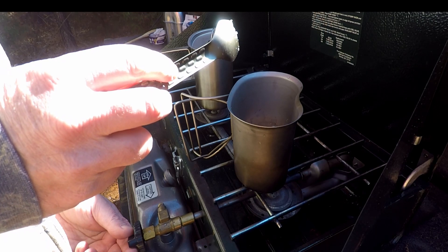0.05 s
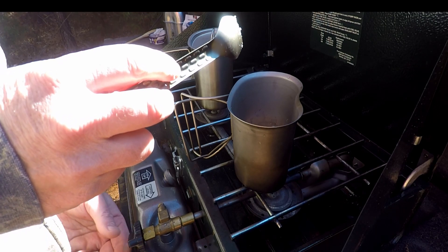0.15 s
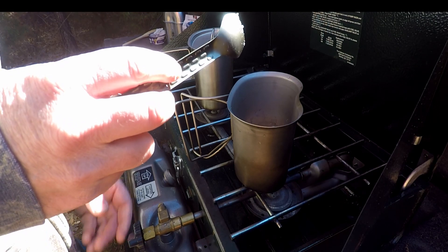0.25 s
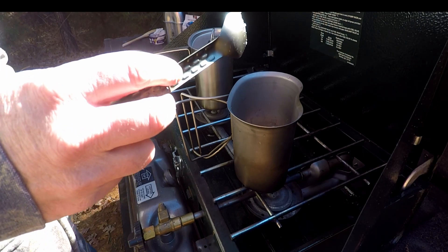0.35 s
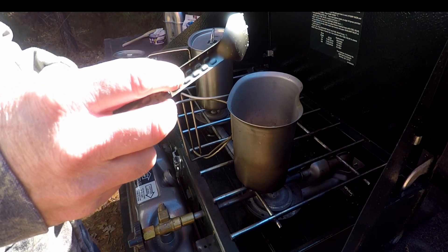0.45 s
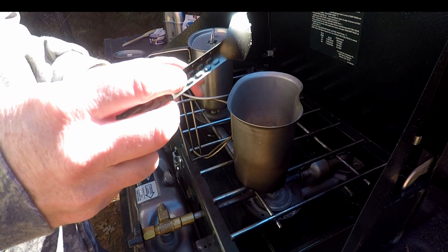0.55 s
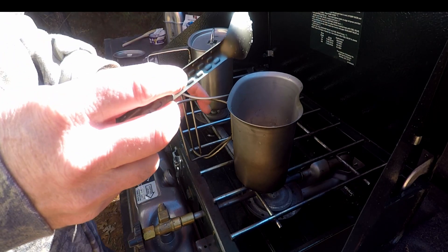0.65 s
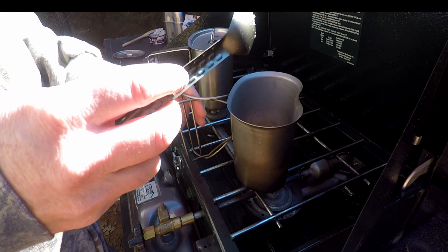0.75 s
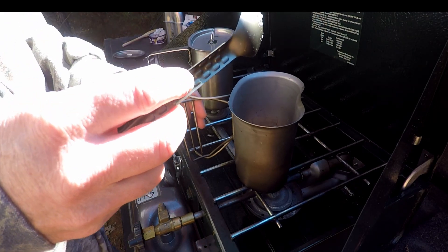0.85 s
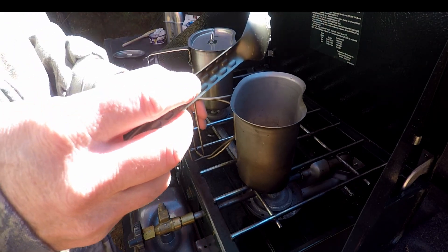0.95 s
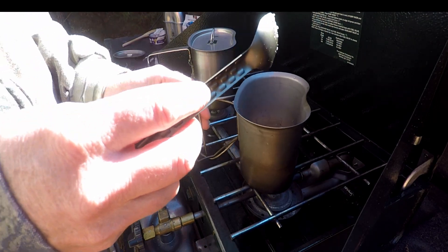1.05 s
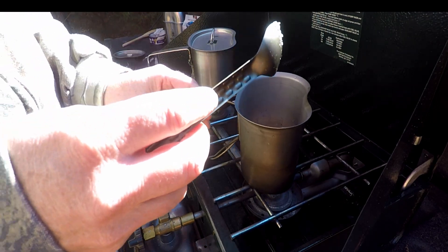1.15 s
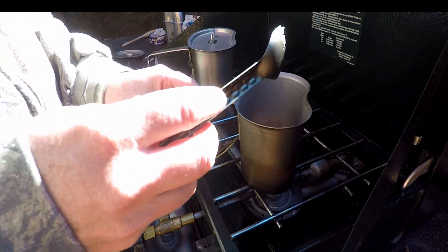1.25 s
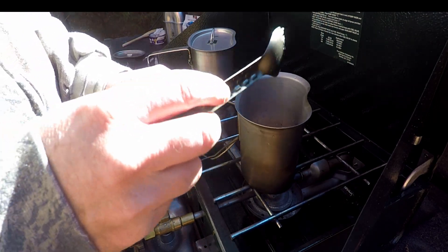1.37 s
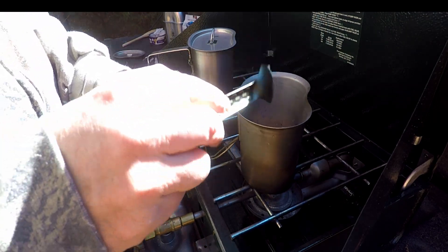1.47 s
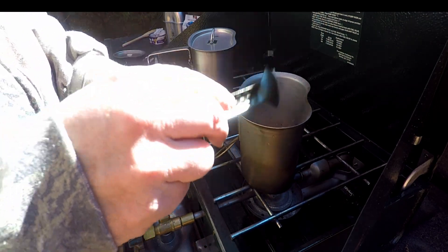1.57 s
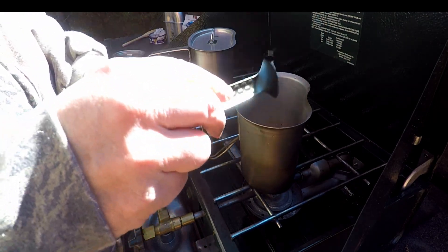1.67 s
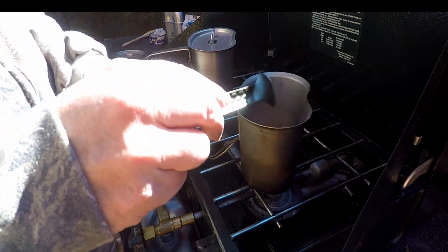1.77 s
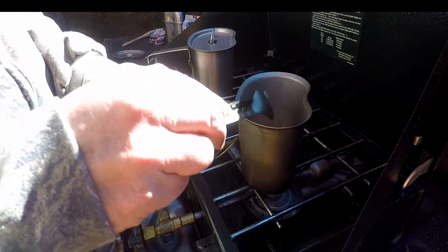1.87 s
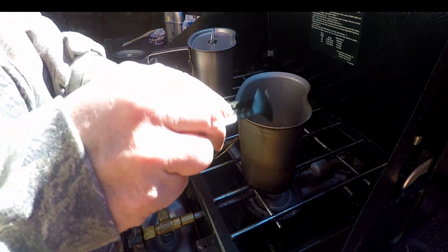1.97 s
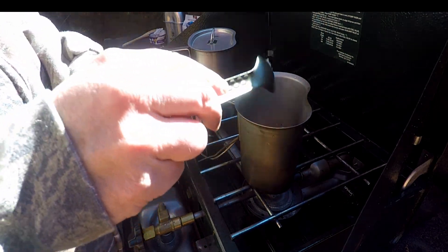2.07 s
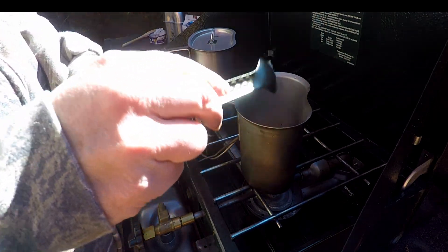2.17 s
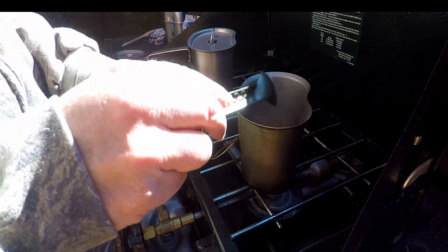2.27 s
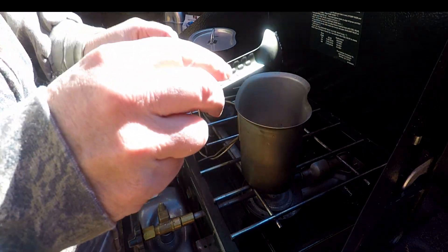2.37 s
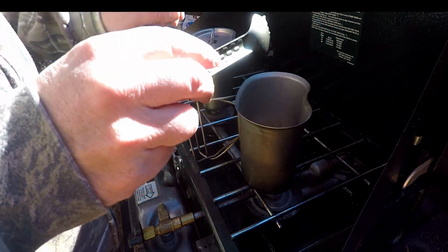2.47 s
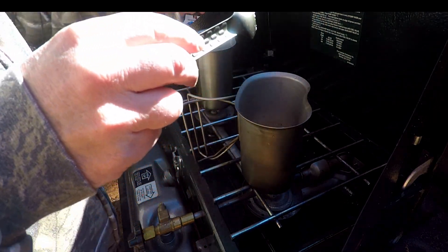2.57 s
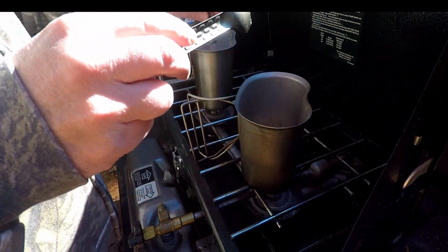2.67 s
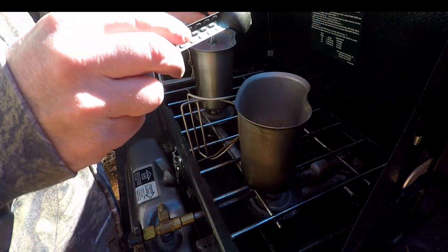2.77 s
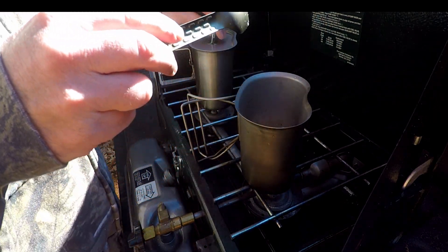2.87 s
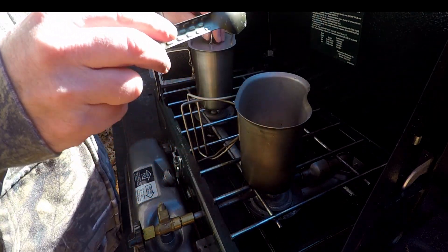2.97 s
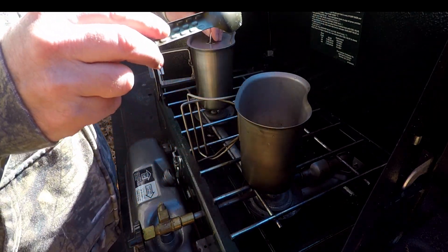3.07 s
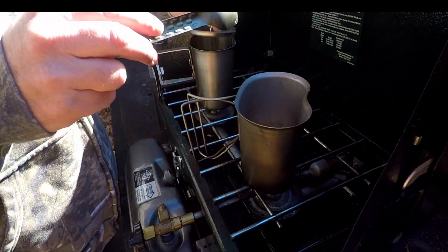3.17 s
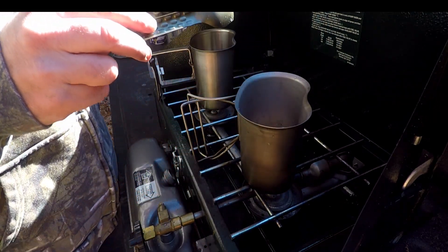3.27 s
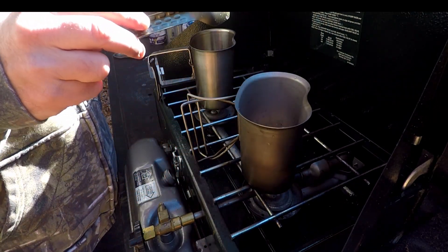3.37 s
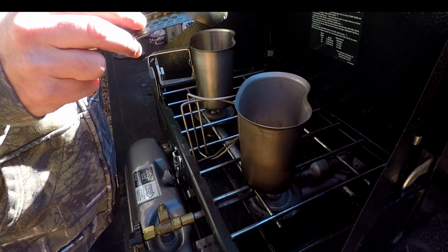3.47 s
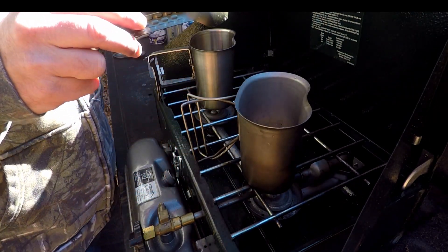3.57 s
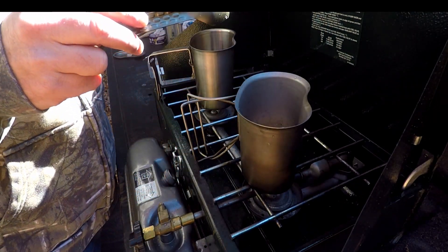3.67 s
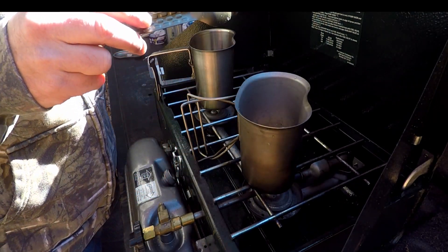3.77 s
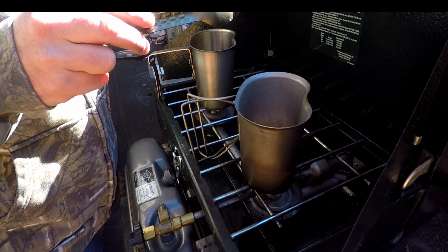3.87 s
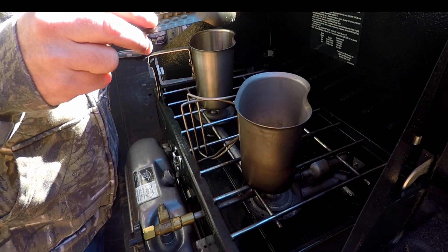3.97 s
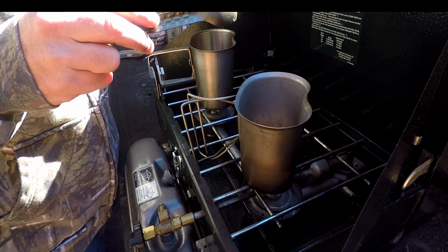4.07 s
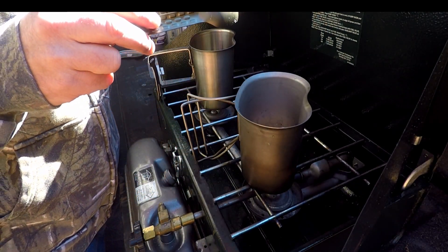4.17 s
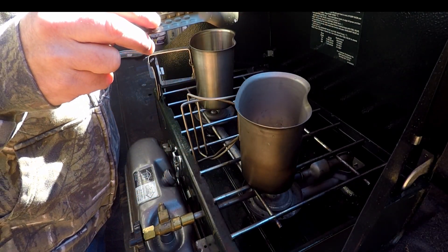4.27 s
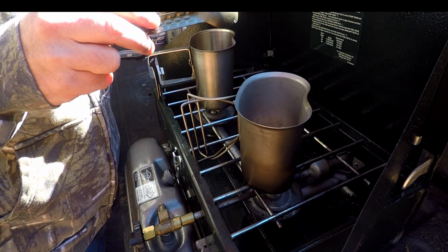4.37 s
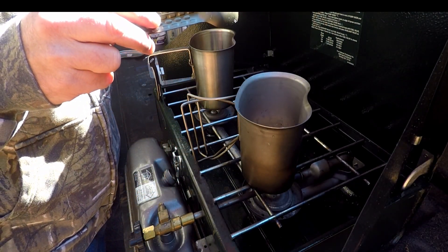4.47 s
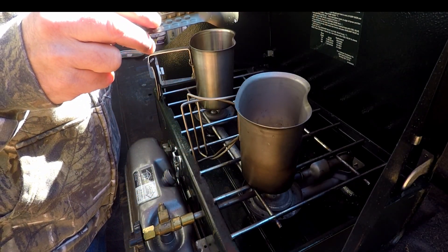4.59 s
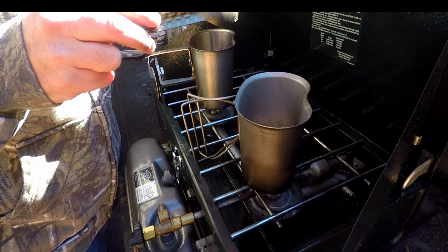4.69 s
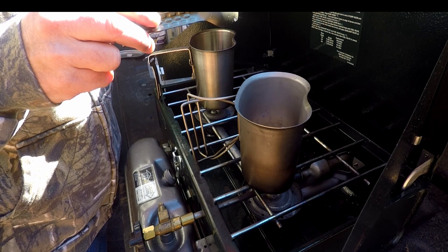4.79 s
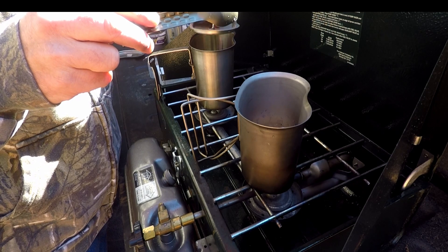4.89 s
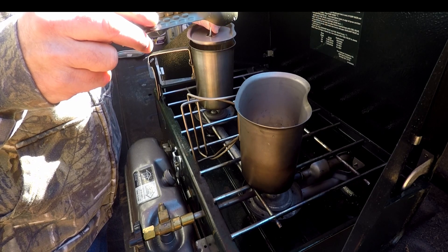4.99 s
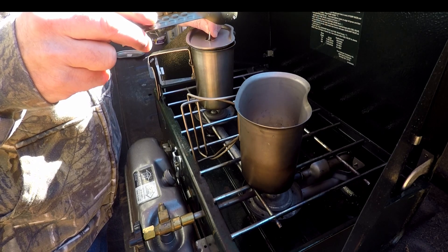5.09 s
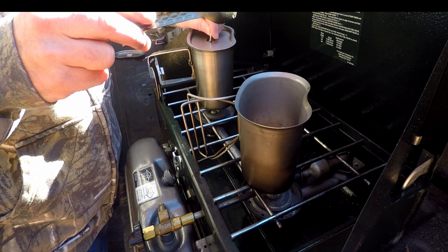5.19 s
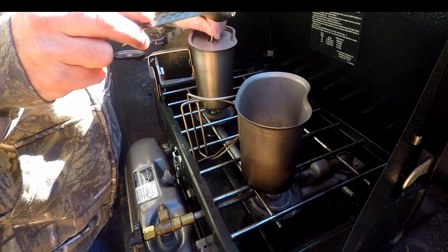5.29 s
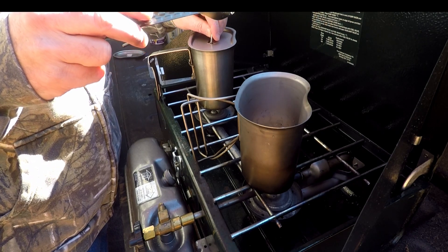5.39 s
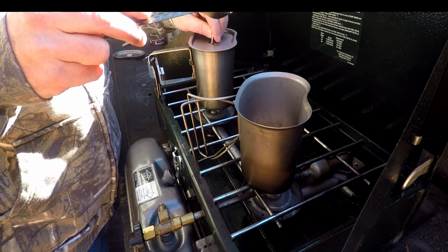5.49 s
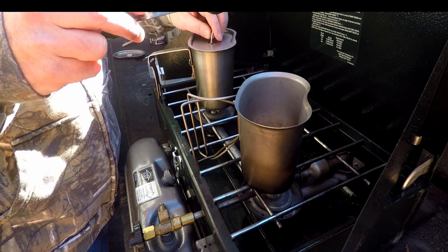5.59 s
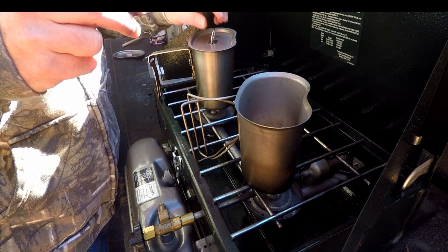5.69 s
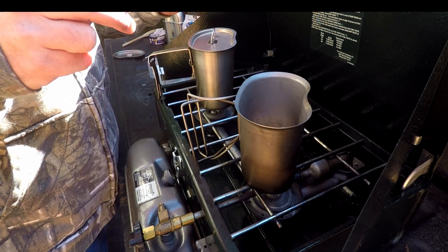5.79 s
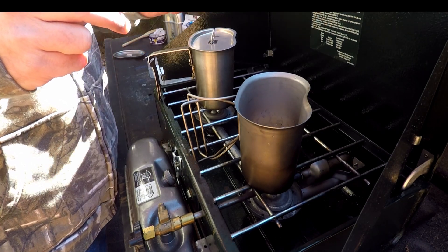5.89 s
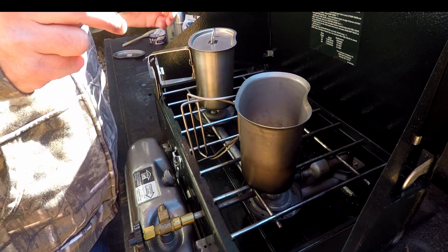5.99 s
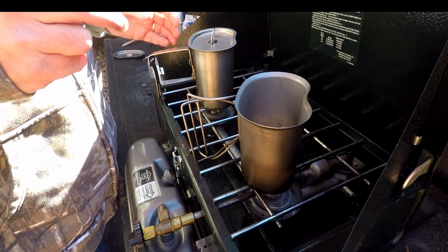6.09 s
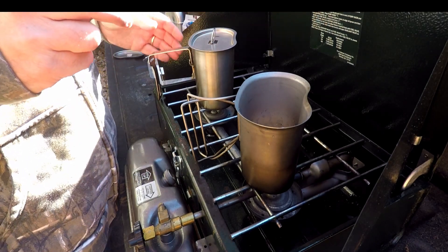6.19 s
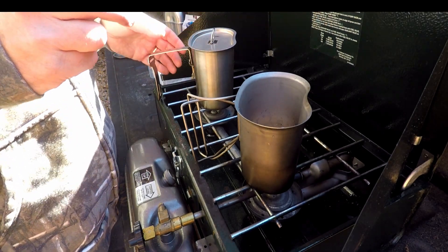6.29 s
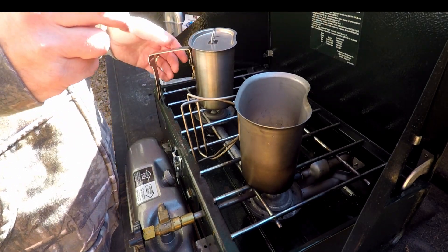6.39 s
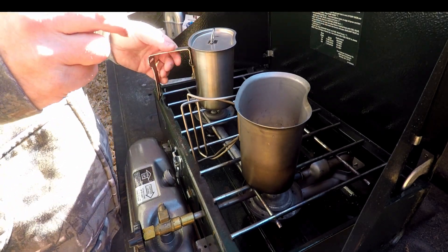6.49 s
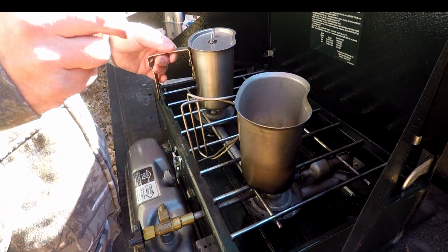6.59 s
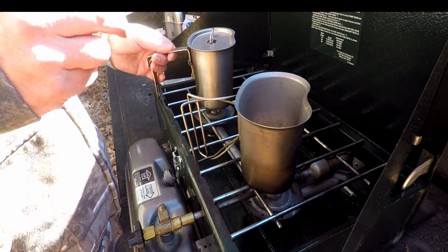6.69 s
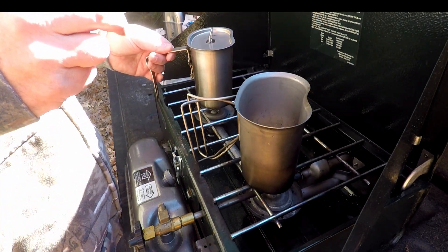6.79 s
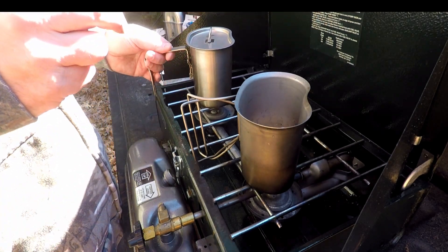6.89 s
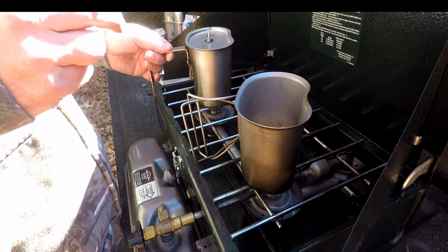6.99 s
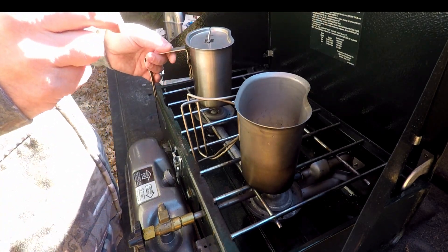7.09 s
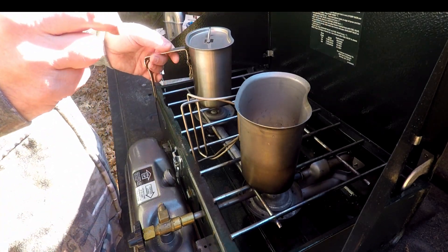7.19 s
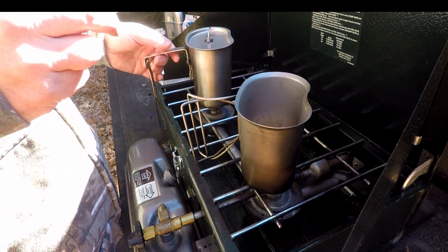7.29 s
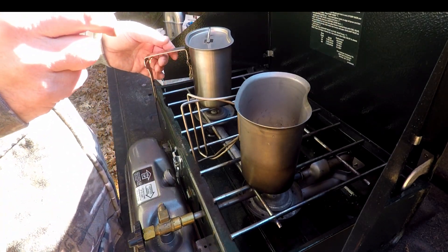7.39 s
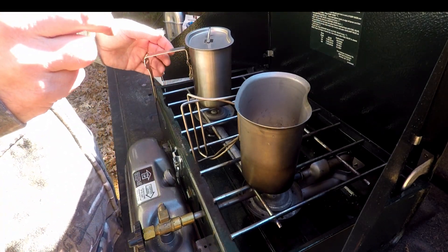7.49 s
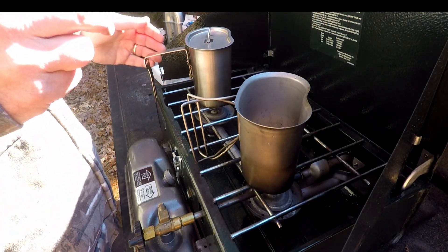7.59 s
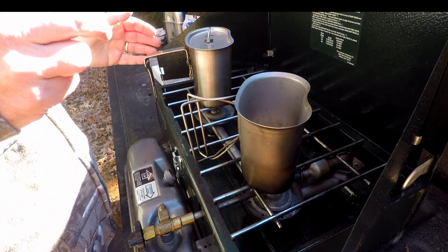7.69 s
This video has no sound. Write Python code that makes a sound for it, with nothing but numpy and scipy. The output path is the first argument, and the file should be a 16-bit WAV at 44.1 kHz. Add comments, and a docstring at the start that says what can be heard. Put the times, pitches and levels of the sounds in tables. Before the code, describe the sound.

A close, dry outdoor microphone hears continuous thin burner hiss and soft wind thumps. A dull bump comes first, then a crisp spoon tap on a steel cup with a low thud of the stove. Next comes a rough cluster of lid scraping and clanking. Only hiss remains for a while, until the lid knocks back onto its cup, ending in a bright hard clank. Light wire ticks and muffled handling knocks finish.

```python
"""A burner hisses through its tubes while slow air pushes on a microphone close to a lit camp stove, outdoors.
A hand knocks and drags things on the sheet-metal case, a spoon taps the near steel cup, and a lid is
lifted off and dropped on the far cup. Hiss is filtered noise; blows ring decaying modes and noise bands;
drags are trains of tiny slips. Jolts make the stand and case hum at low pitch."""
import sys
import numpy as np
from scipy import signal
from scipy.fft import rfft, irfft
from scipy.io import wavfile
from scipy.ndimage import uniform_filter1d

SR = 44100
rng = np.random.default_rng(int(sys.argv[2]) if len(sys.argv) > 2 else 0)


def int16_out(signal):
    """Quantize to a 16-bit WAV file."""
    q = np.round(np.clip(np.atleast_2d(signal).T, -1, 1) * 32767)
    wavfile.write(sys.argv[1], SR, q.astype(np.int16))


def boost_factor(decibels):
    """Convert a level in decibels to a linear amplitude factor."""
    exponent = np.asarray(decibels, float) / 20
    return 10 ** exponent


N = 341669  # length in samples


def unit(x):
    """Scale to rms 1."""
    return x / np.sqrt(np.mean(x ** 2))


def resonate(x, hz, width_hz):
    """Two-pole band-pass, gain 1 at the centre."""
    return signal.lfilter(*signal.iirpeak(hz, hz / width_hz, fs=SR), x)


def walk(rate_hz):
    """Slow random drift with rms 1, from random steps at the given rate, smoothed twice."""
    k = int(SR / rate_hz)
    steps = np.repeat(rng.standard_normal(N // k + 1), k)
    smooth = uniform_filter1d(uniform_filter1d(steps, k), k)
    return unit(smooth[:N])


def fade(t60):
    """One second of exponential decay, falling 60 dB in t60 seconds (0.02 s at the shortest)."""
    return np.exp(-np.log(1000) * np.arange(SR) / SR / np.maximum(t60, 0.02))


def rise(ms):
    """One second of exponential build-up from silence."""
    return 1 - np.exp(-np.arange(SR) / SR * 1000 / ms)


def swell(peak_s, swell_s, db, t60):
    """Gain that climbs to a peak and dies away, both straight in dB."""
    start_below_peak_db = 26  # reached swell_s before the peak
    t = np.arange(N) / SR - peak_s
    return boost_factor(db + np.where(t < 0, start_below_peak_db * t / swell_s, -60 * t / t60))


def add(out, s, rise_ms, sound):
    """Place one blow; the parts chatter for a moment, so the ring builds up."""
    i = int(s * SR)
    out[i:i + SR] += sound * rise(rise_ms)


def ring(modes, tilt=0, free=1):
    """Modes answer one tap; hard contact (tilt, dB per octave) lifts high ones, touch shortens and detunes."""
    t = np.arange(SR) / SR
    phases = 2 * np.pi * rng.random(len(modes))
    detune = 0.015 * (1 - free) ** 2  # relative spread of pitch
    shifts = 1 + detune * rng.standard_normal(len(modes))
    out = np.zeros(SR)
    for (hz, db, t60), phase, shift in zip(modes, phases, shifts):
        gain = boost_factor(db + tilt * np.log2(hz / 1000))
        out += gain * np.sin(2 * np.pi * hz * shift * t + phase) * fade(t60 * free)
    return out


# Air on the microphone. Each row: time in seconds, rms level in dB.
AIR_LEVELS = [(0.0, -42), (0.56, -45.5), (0.62, -41.5), (0.82, -51.5), (1.16, -33), (1.25, -38.5),
              (2.11, -30.5), (2.43, -41), (3.88, -38), (4.53, -49), (5.0, -32), (5.13, -47.5), (5.8, -30),
              (5.86, -41), (5.99, -30.5), (6.23, -39.5), (7.46, -25), (7.74, -33)]


def air_on_microphone():
    """Slow air heaves the membrane a few times a second: noise through two resonances at 5.86 Hz."""
    hz = 5.86
    heave = resonate(resonate(rng.standard_normal(N), hz, 3.24), hz, 5.5)
    seconds, db = np.transpose(AIR_LEVELS)
    return boost_factor(np.interp(np.arange(N) / SR, seconds, db)) * unit(heave)


# A faint low hum. One row: peak in seconds, swell in seconds, peak level in dB, t60 in seconds.
HUM_SWELL = (6.65, 2.5, -61, .25)


def low_hum():
    """A faint hum grows, then dies quickly: noise in a narrow band around 165 Hz."""
    return swell(*HUM_SWELL) * unit(resonate(rng.standard_normal(N), 165, 12))


# Lowest modes of the stand, then of the case. Each row: centre in Hz, wander in Hz rms, relative level in dB.
STAND_MODES = [(46, 3, 0), (60, 5, -3)]
BOOM_MODES = [(107, 4, 0), (93, 5, -5), (160, 5, -14)]
# Jolts to the stove. Each row: peak in seconds, stand swaying in dB, case booming in dB, t60 in seconds.
JOLT_EVENTS = [(0.1, -50, -63, 0.68), (0.785, -43.5, -47, 1.2), (0.99, -46, -44, 0.63),
               (1.851, -33.5, -37.5, 0.57), (1.949, -25.5, -57, 0.2), (2.13, -38.5, -49, 0.73),
               (2.39, -42, -55, 1.04), (2.85, -34, -48, 0.55), (2.89, -46, -42, .4),
               (3.02, -35.5, -49.5, 0.7), (3.14, -40.5, -44, 1.05), (3.35, -45, -63, 1),
               (3.65, -53.5, -70, 1.5), (5.1, -58, -46, 1.3), (5.27, -50, -41, .4), (5.42, -37, -35, 0.88),
               (5.68, -48, -47, 0.31), (5.75, -46, -63, .6), (6.0, -55, -61, 1.4), (6.62, -57, -54.5, .8),
               (6.75, -54, -56, .6), (6.95, -36, -44, 0.49), (7.04, -42, -55, .4), (7.1, -43, -47, 0.43),
               (7.25, -42, -46, 0.51), (7.34, -44, -51.5, 1.3), (7.68, -44.5, -59, 3)]


def shaken_stove():
    """Every jolt makes stand and case hum at their lowest modes, sines of wandering pitch."""
    def hum(modes):
        out = np.zeros(N)
        for hz, wander_hz, db in modes:
            phase = 2 * np.pi * np.cumsum(hz + wander_hz * walk(8)) / SR
            out += boost_factor(db) * np.sin(phase)
        return unit(out)

    sway_rest_db, boom_rest_db = -61.5, -82
    sway_power, boom_power = boost_factor(sway_rest_db) ** 2, boost_factor(boom_rest_db) ** 2
    for s, sway_db, boom_db, t60 in JOLT_EVENTS:
        shape = swell(s, 0.062, 0, t60) ** 2
        sway_power = sway_power + boost_factor(sway_db) ** 2 * shape
        boom_power = boom_power + boost_factor(boom_db) ** 2 * shape
    return np.sqrt(sway_power) * hum(STAND_MODES) + np.sqrt(boom_power) * hum(BOOM_MODES)


# Colour of the broad gas hiss. Each row: frequency in Hz, relative density in dB per Hz.
HISS_COLOUR = [(12, -23), (20, -8), (128, -19), (390, -30.5), (698, -29.5), (1520, -37), (1900, -22.5),
               (2300, -36.5), (3490, -38.5), (5010, -46.5), (6800, -45), (8030, -52.5), (15200, -47)]
# Burner tube resonances. Each row: frequency in Hz, width in Hz, relative gain in dB.
TUBE_MODES = [(708, 52, -8), (1413, 59, -8.5), (1920, 33, 5), (2600, 40, -27), (2700, 31, -7),
              (3420, 7.3, -2), (3640, 13, -27), (4080, 30, -6.5), (4735, 23, -8), (5260, 150, -22),
              (5830, 51, -16.5), (6240, 75, -11.5), (6785, 44, -7.5), (7370, 120, -14.5), (8060, 29, -13.5),
              (8690, 85, -16.5), (9030, 160, -17), (9310, 84, -14), (9995, 96, -13), (10650, 140, -23),
              (12010, 86, -15), (12300, 140, -27), (12700, 150, -36), (12440, 180, -20), (13800, 100, -15),
              (14600, 170, -18.5)]


def burner():
    """Gas hiss, broad and through the tube resonances; each resonance swells and fades by itself."""
    level_db, broad_db, tubes_db = -56.5, -4.5, -4.5  # whole burner, then its two shares
    hz = np.fft.rfftfreq(N, 1 / SR)
    point_hz, point_db = np.transpose(HISS_COLOUR)
    colour = boost_factor(np.interp(np.log(hz + 1), np.log(point_hz), point_db))
    broad = irfft(rfft(rng.standard_normal(N)) * colour, N)
    # The level is set by what lies above 200 Hz.
    broad /= np.std(signal.lfilter(*signal.butter(2, 200, "high", fs=SR), broad))
    tubes = np.zeros(N)
    for mode_hz, width_hz, db in TUBE_MODES:
        tubes += boost_factor(db + 0.5 * walk(4.15)) * resonate(rng.standard_normal(N), mode_hz, width_hz)
    drift = boost_factor(level_db + 0.18 * walk(1.39))
    return drift * (boost_factor(broad_db) * broad + boost_factor(tubes_db) * unit(tubes))


# Dense ringing of the sheet-metal case. Each row: band centre in Hz, relative level in dB, t60 in seconds.
CASE_BANDS = [(139, -19, 0.33), (236, -24, 0.53), (398, -24, 0.46), (884, -21, 0.4), (1194, -19.5, 0.27),
              (1850, -16, 0.1), (2830, -21.5, 0.18), (3870, -26, 0.17), (4980, -39.5, 0.087),
              (6200, -34.5, 0.098), (8800, -36.5, 0.11), (12000, -38, 0.02), (15300, -43, 0.026)]


def case_noise():
    """One noise band of rms 1 per row of the case, split midway between centres on a log scale."""
    centres = np.array(CASE_BANDS)[:, 0]
    edges = np.r_[centres[0] / np.sqrt(2), np.sqrt(centres[1:] * centres[:-1]), 0.4 * SR]
    bands = []
    for pair in zip(edges, edges[1:]):
        band_pass = signal.butter(2, pair, "band", fs=SR, output="sos")
        bands.append(unit(signal.sosfilt(band_pass, rng.standard_normal(N + SR))))
    return bands


# Strong panels of the case. Each row: frequency in Hz, relative level in dB, free t60 in seconds.
PANEL_MODES = [(242, -8, .36), (320, -4, .4), (358, -1, .3), (388, -4, .4), (433, -7, .3), (585, -7, .25),
               (770, 0, .3), (815, -6, .2), (940, -8, .25), (1366, -7, .15)]


def case_ring(bands, s, tilt=0, panels_db=-22):
    """Sheet metal has too many modes to count: a contact crack, noise that fills the case, a few panels."""
    i = int(s * SR)
    crack = boost_factor(4) * fade(0.038)
    fill = rise(6.8)  # ms the ring takes to fill the case
    dense = np.zeros(SR)
    for (hz, db, t60), band in zip(CASE_BANDS, bands):
        crack_weight = min(hz / 850, 1)  # little crack at low pitch
        shape = crack * crack_weight + fill * fade(t60)
        dense += boost_factor(db + tilt * np.log2(hz / 1000)) * band[i:i + SR] * shape
    return dense + boost_factor(panels_db) * ring(PANEL_MODES, tilt)


# Things dragged over the stove swell, then are let go. Each row: peak in seconds, swell in seconds,
# dull rumble in dB, metal rubbing in dB, t60 of the rumble in seconds.
DRAG_EVENTS = [(0.79, 0.014, -52.5, -63, 0.55), (0.96, 0.22, -48.5, -63, 1), (1.05, 0.14, -52, -64, 0.42),
               (1.855, 0.0051, -36, -40, 0.35), (2.21, 0.016, -57, -78, 0.42), (2.5, 0.31, -56, -58, 0.69),
               (2.87, 0.034, -46.5, -52, 0.38), (3.03, 0.12, -40, -43, 0.28), (3.075, .02, -41.5, -53, 0.4),
               (3.13, 0.026, -51, -70, 0.93), (5.253, 0.028, -44, -49, 0.17),
               (5.373, 0.079, -50.5, -34.5, 0.13), (5.9, .05, -77, -61, 0.48), (6.72, 0.22, -50.5, -59, 1),
               (6.87, 0.19, -51, -69, 0.42), (6.96, 0.057, -64, -52.5, 0.94), (7.08, 0.081, -54, -61, .3),
               (7.27, 0.12, -52, -76, 0.33), (7.33, .02, -53, -77, 0.57), (7.55, 0.054, -60, -74, 0.79),
               (7.745, 0.029, -52, -72, .3)]


def drags(bands):
    """Uneven slips shake the case dully; where metal rubs, cup and lid sing along, damped by the hand."""
    def slips(body):
        hits = rng.random(N) < 1500 / SR  # about 1500 slips a second
        force = rng.standard_normal(N) * hits * boost_factor(0.7 * rng.exponential(size=N))
        return unit(signal.fftconvolve(force, body)[:N])

    dull = slips(case_ring(bands, 0, -2.0, -10.0) * fade(0.3))
    metal = ring(LID_RING) + boost_factor(-13) * ring(FAR_CUP_RING) + boost_factor(6.5) * case_ring(bands, 0.78, 0.44)
    bright = slips(metal * fade(0.15))
    out = np.zeros(N)
    for s, swell_s, dull_db, metal_db, t60 in DRAG_EVENTS:
        out += swell(s, swell_s, dull_db, t60) * dull
        out += swell(s, swell_s, metal_db, 0.58 * t60) * bright  # rubbing stops sooner
    return out


# Hand and handle on the stove. Each row: start in seconds, case gain in dB, case hardness in dB per octave, #
# extra panel gain in dB, handle tick in Hz, tick level in dB.
KNOCK_EVENTS = [(0.759, -28, -3, -51, 3120, -57), (2.809, -29.5, -2.5, -39.5, 4080, -52),
                (3.529, -53, 9.5, -69, 4080, -64), (5.384, -30.5, -3, -34, 1050, -34),
                (5.795, -49, 3, -79, 3430, -68), (5.889, -43.5, 3.5, -77, 2700, -51),
                (6.548, -46, 6.5, -63, 3960, -42), (6.609, -54, 8.5, -75, 3000, -53),
                (6.725, -36, 4, -49, 1850, -38), (6.809, -41.5, 3.6, -66, 2880, -57),
                (6.929, -32.5, -3.8, -43, 2690, -47), (6.95, -40, -4, -59, 3380, -42),
                (7.013, -45.5, 7.5, -59, 4420, -41), (7.059, -37.5, 2, -52, 3060, -55),
                (7.217, -41.5, -4.8, -50, 4600, -56), (7.269, -37, -3.5, -58, 2820, -57)]


def hand_knocks(bands):
    """A hand or handle rings the case and its damped panels, and the handle ticks at one pitch."""
    out = np.zeros(N + SR)
    for s, case_db, tilt, panels_db, tick_hz, tick_db in KNOCK_EVENTS:
        tick = ring([(tick_hz, tick_db, 0.042)])
        panels = boost_factor(panels_db) * ring(PANEL_MODES, -3.5, 0.35)
        add(out, s, 4.4, boost_factor(case_db) * case_ring(bands, s, tilt) + tick + panels)
    return out[:N]


# What rings in the far cup and its lid. Each row: frequency in Hz, relative level in dB, free t60 in seconds.
FAR_CUP_RING = [(1290, -14, .06), (1590, -13, .08), (2303, 0, .15), (2560, -10, .11), (2715, -6, .05),
                (3065, -11, .1), (3618, -17, .22), (3903, -10, .07), (4247, -15, .09), (5880, -22, .06),
                (6961, -21, .06), (8258, -23, .08), (8995, -25, .07), (10500, -29, .08)]
LID_RING = [(1723, 0, .075), (2175, -13, .065), (3537, -15, .15), (3941, -12, .09), (4366, -18, .09),
            (4640, -23, .22), (5669, -22, .1), (5900, -25, .1), (6200, -24, .06), (6530, -27, .09),
            (7955, -23, .17), (8554, -27, .08), (9367, -30, .1), (10000, -33, .1)]
# Lid on the far cup. Each row: start in seconds, case gain in dB, cup gain in dB, lid gain in dB,
# share of the free ring time left to cup and lid, case hardness in dB per octave.
LID_EVENTS = [(2.838, -32.5, -50, -28, 0.41, -0.5), (2.873, -51, -47, -53, 0.6, 0),
              (2.978, -20.5, -54, -36, 0.48, -1.3), (3.019, -40, -45, -37, 0.39, 3.5),
              (3.044, -19.5, -30, -20.5, 0.49, 1.5), (3.054, -43, -31.5, -38, 0.85, 2.5),
              (3.113, -33, -52, -56, 0.53, -2), (5.07, -22.5, -23.5, -33, 1, 1.4),
              (5.133, -24.5, -32.5, -20, 1, 3.5), (5.227, -24.5, -42, -32.5, 1, 1.5),
              (5.332, -35, -50, -40, .9, 1), (5.381, -17, -41, -43, 0.3, 2.5),
              (5.387, -26.5, -9, -13, 0.27, 8), (5.394, -29.5, -47, -20, 0.88, 5)]


def lid_on_far_cup(bands):
    """Each contact rings lid, cup and the case beneath; touch shortens and detunes the lid and cup modes."""
    out = np.zeros(N + SR)
    for s, case_db, cup_db, lid_db, free, tilt in LID_EVENTS:
        cup = boost_factor(cup_db) * ring(FAR_CUP_RING, free=free)
        lid = boost_factor(lid_db) * ring(LID_RING, free=free)
        add(out, s, 1.9, boost_factor(case_db) * case_ring(bands, s, tilt) + cup + lid)
    return out[:N]


# What rings in the near cup. Each row: frequency in Hz, relative level in dB, t60 in seconds.
NEAR_CUP_RING = [(533, -20, .3), (592, -9, .28), (680, -7, .08), (764, -3, .25), (937, -18, .25),
                 (1370, -2, .12), (1707, -12, .18), (2778, -8, .26), (2900, -14, .06), (3015, -24, .3),
                 (3095, -22, .2), (3924, -13, .13), (4247, -25, .25), (4328, -23, .24), (5529, -12, .09),
                 (6228, -26, .15), (7655, -18, .08), (8183, -22, .1), (8699, -24, .12), (9480, -15, .05),
                 (10000, -9, .04), (10600, -13, .05), (12500, -14, .03), (13800, -16, .03)]
# Spoon on the near cup. Each row: start in seconds, case gain in dB, cup gain in dB,
# case hardness in dB per octave.
SPOON_EVENTS = [(1.828, -24, -23, 5), (1.844, -28.5, -65, -4), (1.974, -40, -46.5, 0),
                (2.184, -40, -55, -4.5)]


def spoon_on_near_cup(bands):
    """Taps with an almost instant onset ring the free cup modes and the case beneath."""
    out = np.zeros(N + SR)
    for s, case_db, cup_db, tilt in SPOON_EVENTS:
        cup = boost_factor(cup_db) * ring(NEAR_CUP_RING)
        add(out, s, 0.05, boost_factor(case_db) * case_ring(bands, s, tilt) + cup)
    return out[:N]


def scene():
    """All sources as one microphone close to the stove hears them."""
    bands = case_noise()
    background = air_on_microphone() + low_hum() + shaken_stove() + burner()
    handling = drags(bands) + hand_knocks(bands) + lid_on_far_cup(bands) + spoon_on_near_cup(bands)
    return (background + handling)[None]


def roll_off(x):
    """The treble ends steeply here."""
    return signal.sosfilt(signal.butter(12, 16300, fs=SR, output="sos"), x)


def record(dry):
    """The camera cuts the top with a steep low-pass at 15230 Hz."""
    low_pass = signal.ellip(8, 0.2, 32, 15230, fs=SR, output="sos")
    mix = signal.sosfilt(low_pass, dry)
    return roll_off(mix)


dry = scene()
out = record(dry)
int16_out(out)
```